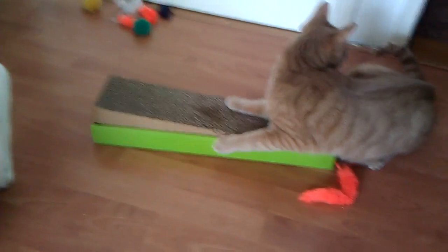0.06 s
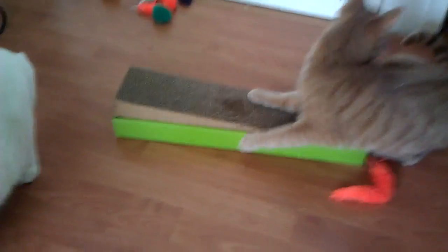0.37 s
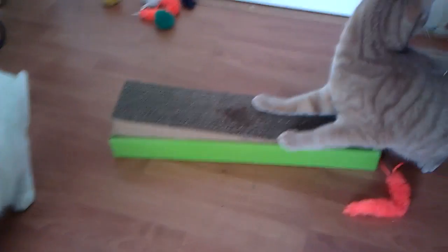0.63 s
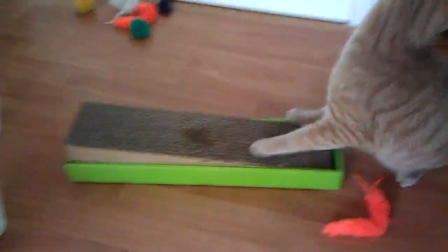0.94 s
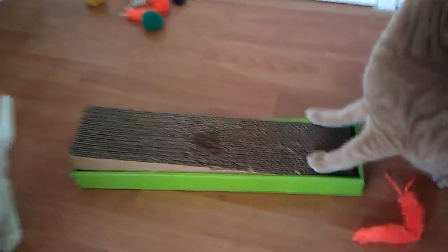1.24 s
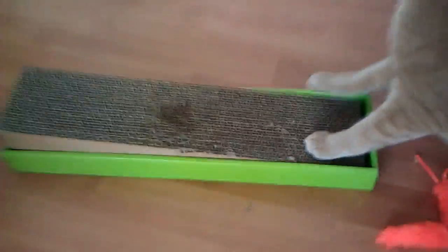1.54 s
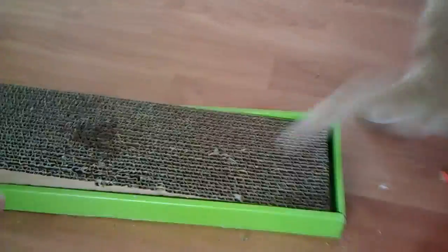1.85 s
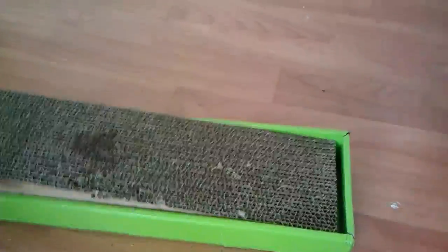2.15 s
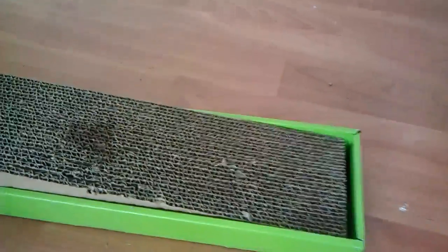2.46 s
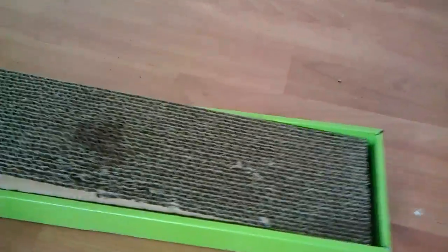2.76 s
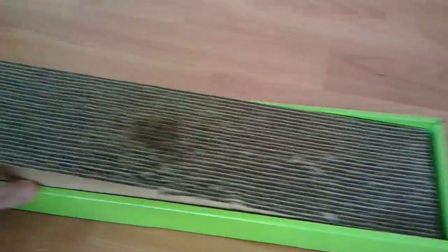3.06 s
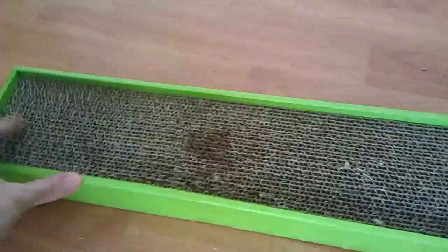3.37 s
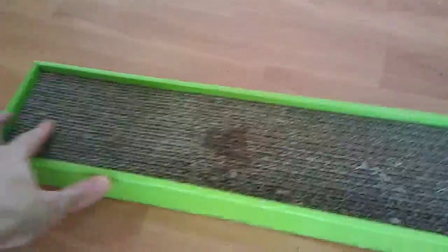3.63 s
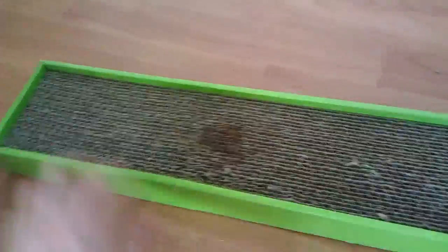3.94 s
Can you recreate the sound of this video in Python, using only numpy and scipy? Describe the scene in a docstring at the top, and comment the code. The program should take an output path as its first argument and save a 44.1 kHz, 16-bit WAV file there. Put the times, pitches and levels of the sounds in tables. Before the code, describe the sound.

Claws rake dryly over corrugated cardboard in a quiet little room, fading to light rubbing and ticks. Near the end the pad scrapes along and drops into its tray with one loud clack and a brief rasp.

```python
"""Dry, papery rasps: a cat rakes a corrugated cardboard pad, its claws snapping over the ridges.
It shifts its weight so that the pad bumps its tray, and shuffles off. After some light brushing, a hand
slides the pad along and presses it home with a sharp knock that rings the tray. The rubbing is tiny
fibre slips over smooth hiss; the hits are noise bursts coloured by the board. A small room with a hard
floor answers the hits, over a faint bed of air."""
import sys
import numpy as np
from scipy import signal
from scipy.fft import rfft, irfft
from scipy.io import wavfile
from scipy.ndimage import uniform_filter1d, minimum_filter1d

SR = 44100
rng = np.random.default_rng(int(sys.argv[2]) if len(sys.argv) > 2 else 0)


def put_to_file(sound):
    """Save the sound as 16-bit audio at rate SR, in the file named by the first command-line argument."""
    columns = np.atleast_2d(sound).T  # one column per channel
    safe = np.clip(columns, -1, 1)
    whole_steps = np.round(safe * 32767)
    wavfile.write(sys.argv[1], SR, whole_steps.astype(np.int16))


N = 176400
TOP_HZ = 8900

# the pad's body when rubbed: freq_hz, level_db
PAD_BODY = [(80, -17.5), (200, -7), (450, -3), (750, -3.5), (1100, -1.5), (1700, 1), (2400, -3.5),
            (4000, -25)]
# hiss of a soft rub: freq_hz, level_db
SOFT_HISS = [(1500, -37), (2600, -17), (3600, -12.5), (4500, -10), (5500, -4.5), (6200, -2.5), (6900, -9),
             (7800, -20.5), (8900, -41)]


def amp(db):
    """Decibels to gain."""
    return 10 ** (np.asarray(db) / 20)


def unit(x):
    """Scale to rms 1."""
    return x / np.sqrt(np.mean(x ** 2) + 1e-20)


def along(points, hz):
    """Read a curve of (freq_hz, value) points on a log axis."""
    freqs, values = np.transpose(points)
    return np.interp(np.log(hz + 1), np.log(freqs + 1), values)


def level(rows):
    """Gain envelope from (time_s, level_db) points, silent beyond them."""
    s, db = np.transpose(rows)
    return uniform_filter1d(amp(np.interp(np.arange(N) / SR, s, db, left=-120, right=-120)), size=64)


def coloured(x, spectrum):
    """Equalise x and cut it above TOP_HZ, at rms 1."""
    hz = np.fft.rfftfreq(len(x), 1 / SR)
    return unit(irfft(rfft(x) * amp(along(spectrum, hz)) * (hz < TOP_HZ), len(x)))


def through(x, spectrum):
    """Give x this spectrum with a minimum-phase filter, which keeps the attack crisp."""
    n = len(x)
    own = np.abs(uniform_filter1d(np.abs(rfft(x)) ** 2, size=24)) ** .5 + 1e-9
    wanted = amp(along(spectrum, np.fft.rfftfreq(n, 1 / SR)))
    cepstrum = irfft(np.log(wanted / own), n)
    cepstrum[1:n // 2] *= 2
    cepstrum[n // 2 + 1:] = 0
    return irfft(rfft(x) * np.exp(rfft(cepstrum)), n)


def burst(spectrum, attack_s, t60_s, cutoff_hz=TOP_HZ):
    """One contact: a short noise burst coloured by the board, dulled above cutoff_hz."""
    t = np.arange(SR // 4) / SR
    push = (1 - np.exp(-t / attack_s)) * np.exp(-np.log(1000) * t / t60_s)
    board = through(push * rng.standard_normal(len(t)), spectrum)
    dulled = signal.sosfilt(signal.butter(3, cutoff_hz, fs=SR, output="sos"), board)
    return unit(dulled) * np.sqrt(np.mean(push ** 2))


def friction(spectrum, smooth_share=0.53, slips_per_s=1400, spread_db=0.5):
    """Paper fibres slipping: tiny random clicks over a smooth rub."""
    slips = (rng.random(N) < slips_per_s / SR) * rng.choice([-1, 1], N)
    slips = unit(slips * amp(spread_db * np.minimum(rng.exponential(size=N), 4)))
    rub = rng.standard_normal(N)
    return coloured(np.sqrt(1 - smooth_share) * slips + np.sqrt(smooth_share) * rub, spectrum)


def patchy(x, flicker_db=4):
    """The hiss flickers in shallow, random patches of colour."""
    bands = signal.stft(x, nperseg=2048)[2]
    patches = uniform_filter1d(rng.standard_normal(bands.shape), size=2, axis=0)
    patches = unit(uniform_filter1d(patches, size=8, axis=1))
    return unit(signal.istft(bands * amp(flicker_db * patches), nperseg=2048)[1][:N])


def strokes(curves, hiss, body, body_db, body_exponent, smooth_share):
    """Rubbing on the pad: the paper hisses and the body follows less steeply."""
    effort = sum(level(c) for c in curves)
    body_gain = amp(body_db) * effort.max() * np.abs(effort / effort.max()) ** body_exponent
    return effort * patchy(friction(hiss, smooth_share)) + body_gain * friction(body)


def claw_rakes():
    """Claws scratch the paper in short, bright strokes."""
    curves = [
        [(0.0, -32), (0.018, -34), (0.042, -36), (0.048, -30.5), (0.082, -51), (0.1, -50)],
        [(0.1, -48), (0.154, -44), (0.172, -40.5), (0.188, -47), (0.23, -42.5), (0.268, -46.5), (0.41, -50)],
    ]  # one envelope a stroke: time_s, level_db
    hiss = [(1500, -35), (2500, -12), (3300, -10), (4400, -9), (5300, -0.5), (6300, -3), (7100, -2.5),
            (7900, -20.5), (8900, -26)]  # claws on paper: freq_hz, level_db
    return strokes(curves, hiss, PAD_BODY, body_db=-26.5, body_exponent=0.37, smooth_share=0.58)


def edge_snaps():
    """Edges of the corrugation catch and let go."""
    snaps = [(0.044, -47), (.161, -52), (0.216, -35), (0.488, -44), (0.66, -44), (.673, -47), (1.054, -47),
             (1.093, -52), (2.528, -42), (2.685, -40.5), (2.801, -34.5), (2.9825, -35), (3.453, -21),
             (3.484, -27)]  # paper edges: start_s, level_db
    colour = [(300, -34), (1500, -14), (2600, -31.5), (4000, -9.5), (6000, 13), (7200, -3), (8000, -14),
              (9000, -30)]  # a thin, bright tick: freq_hz, level_db
    out = np.zeros(N)
    for s, db in snaps:
        add(out, s, amp(db) * burst(colour, attack_s=0.00074, t60_s=0.039))
    return out


def claw_pull():
    """Claws drag through the pad in one long, surging rasp."""
    curves = [
        [(0.41, -53), (0.444, -41), (0.474, -40), (0.5, -30), (0.628, -42.5), (0.678, -33.5), (0.698, -43),
         (0.718, -34), (0.768, -46.5), (0.82, -51.5)],
    ]  # stroke envelope: time_s, level_db
    hiss = [(1500, -33), (2500, -16), (3300, -13), (4300, -10.5), (5200, -3.5), (6200, -1.5), (7100, 0),
            (7700, -16.5), (8900, -29.5)]  # dragging claws: freq_hz, level_db
    return strokes(curves, hiss, PAD_BODY, body_db=-23, body_exponent=0.3, smooth_share=0.74)


def soft_bumps():
    """Paws and fingers land and the pad rocks against its tray."""
    bumps = [(0.662, -37, 450, 0.041), (.669, -32, 2400, 0.14), (0.7098, -25, 1370, 0.13),
             (0.727, -32, 1300, 0.11), (.857, -38.5, 690, 0.057), (.976, -42.5, 450, 0.062),
             (1.059, -45.5, 900, .05), (1.089, -49.5, 600, 0.24), (1.118, -48.5, 384, 0.083),
             (1.19, -47, 346, 0.046), (2.354, -49.5, 600, 0.063), (2.568, -52, 2030, 0.054),
             (2.596, -48.5, 1610, 0.11), (2.618, -43.5, 292, 0.042), (2.677, -48.5, 1140, 0.066),
             (3.077, -44, 1010, 0.042), (3.321, -51, 503, 0.072)]  # soft contacts: start_s, level_db, cutoff_hz, t60_s
    colour = [(40, -30), (90, -14), (170, 0), (260, -5), (390, -1), (560, -3.5), (830, -0.5), (1250, -3),
              (2000, -2.5), (6000, 12)]  # the thud before its low-pass: freq_hz, level_db
    out = np.zeros(N)
    for s, db, hz, t60 in bumps:
        add(out, s, amp(db) * burst(colour, attack_s=0.0031, t60_s=t60, cutoff_hz=hz))
    return out


def paw_shuffles():
    """Paws rub the paper as the cat steps off."""
    curves = [
        [(0.82, -49), (0.862, -51.5), (1.002, -46), (1.06, -37), (1.074, -43.5), (1.092, -41), (1.158, -53.5),
         (1.2, -51)],
        [(1.2, -54), (1.444, -49.5), (1.502, -52.5), (1.91, -38.5), (2.028, -45.5), (2.054, -53.5),
         (2.094, -54.5), (2.1, -52)],
    ]  # one envelope a stroke: time_s, level_db
    return strokes(curves, SOFT_HISS, PAD_BODY, body_db=-13.5, body_exponent=0.91, smooth_share=0.52)


def light_brushes():
    """Light touches whisper across the pad."""
    curves = [
        [(2.1, -55), (2.256, -50.5), (2.34, -51), (2.37, -57), (2.444, -61.5), (2.534, -47), (2.558, -55),
         (2.66, -55.5)],
        [(2.66, -65), (2.68, -52), (2.792, -47), (2.802, -42.5), (2.974, -57), (2.984, -55), (2.99, -44),
         (3.23, -52.5)],
        [(3.7, -63), (3.752, -62), (3.786, -53.5), (3.808, -55), (3.824, -49.5), (3.866, -56.5), (3.882, -65),
         (4.0, -74)],
    ]  # one envelope a stroke: time_s, level_db
    return strokes(curves, SOFT_HISS, PAD_BODY, body_db=-13.5, body_exponent=0.93, smooth_share=0.7)


def pad_slide():
    """A hand pushes the pad along with a grainy scrape."""
    curves = [
        [(3.23, -52), (3.3, -32), (3.39, -41.5), (3.41, -36.5), (3.436, -39), (3.454, -32), (3.476, -33),
         (3.488, -24.5)],
    ]  # stroke envelope: time_s, level_db
    hiss = [(1500, -31), (2600, -6.5), (3500, -9), (4500, -4), (5500, -0.5), (6100, 2.5), (6900, -2),
            (7800, -16.5), (8900, -33.5)]  # sliding cardboard: freq_hz, level_db
    body = [(100, -16.5), (400, -12), (750, 3.5), (1200, -1), (1900, 6.5), (2400, -9), (4000, -26.5)]  # the moving pad's body: freq_hz, level_db
    return strokes(curves, hiss, body, body_db=-14, body_exponent=0.82, smooth_share=0.28)


def tray_knock(ring_db=-16, ring_attack_s=0.00066):
    """The pad drops into the tray in quick contacts; the hardest sets both ringing."""
    contacts = [(3.4912, -32, 7000), (3.4971, -10.5, 793), (3.4989, -8, 7550), (3.5019, -9, 2400),
                (3.506, -20, 1630), (3.5113, -25, 6000)]  # pad on tray: start_s, level_db, cutoff_hz
    colour = [(30, -17), (90, -13.5), (180, -0.5), (250, -8), (330, 10), (480, -5), (720, -4.5), (950, 2.5),
              (1200, -1), (1950, 7.5), (2400, -17), (3200, 3.5), (4900, -2.5), (6000, 12), (6700, -5),
              (7600, -12), (9000, -30)]  # a hard clack: freq_hz, level_db
    modes = [(134.4, -11, 0.33), (183.7, -5.5, 0.28), (317, -0.5, .19), (374, -4, .18), (580.4, 6.5, 0.054),
             (1023, -1, 0.056), (1140, -4, 0.18), (1254, 1.5, 0.18), (1400, -6, 0.11), (1540, -29, 0.11),
             (1930, -1, 0.14), (3094, 7.5, .1), (3106, -7.5, .1), (3595, 0, .1)]  # pad and tray resonances: pitch_hz, level_db, t60_s
    out, t = np.zeros(N), np.arange(SR // 2) / SR
    for s, db, hz in contacts:
        add(out, s, amp(db) * burst(colour, attack_s=0.00012, t60_s=0.035, cutoff_hz=hz))
    ring = sum(amp(db) * np.exp(-np.log(1000) * t / t60) * np.sin(2 * np.pi * (hz * t + rng.random()))
               for hz, db, t60 in modes)
    hardest_s, hardest_db, _ = max(contacts, key=lambda row: row[1])
    add(out, hardest_s, amp(hardest_db + ring_db) * ring * (1 - np.exp(-t / ring_attack_s)))
    return out


def seating_scrape():
    """The pad's sides scrape down the tray walls."""
    curve = [(3.488, -33), (3.504, -14), (3.53, -25.5), (3.565, -27), (3.58, -46), (3.592, -58),
             (3.66, -72)]  # scrape envelope: time_s, level_db
    colour = [(50, -24), (100, -18.5), (300, -7), (600, -1.5), (1000, -1.5), (2000, -10), (2400, -5),
              (3200, -8), (4500, -2), (6200, -4), (7000, -4.5), (7800, -19.5), (9000, -36)]  # a broad rasp: freq_hz, level_db
    return level(curve) * patchy(friction(colour))


def room_echo(x, wall_delay_s=0.006):
    """A short, dense echo whose top treble dies first."""
    decay = [(100, 0.24), (300, 0.3), (1000, 0.27), (4000, .27), (8000, 0.23)]  # reverb time: freq_hz, t60_s
    hz, t, bands = signal.stft(rng.standard_normal(SR // 2), SR, nperseg=256)
    fade = np.exp(-np.log(1000) * t / along(decay, hz)[:, None])
    tail = signal.istft(bands * fade, SR, nperseg=256)[1]
    response = np.pad(tail / np.linalg.norm(tail), (round(wall_delay_s * SR), 0))
    return signal.fftconvolve(x, response)[:N]


def room_air():
    """Faint room noise swells and sinks under everything."""
    colour = [(20, 2.5), (45, -13), (65, 7), (100, -3), (200, -3), (400, -1.5), (800, -2.5), (1000, -1.5),
              (1200, -4), (2500, -11.5), (4000, -12), (6000, -3.5), (7500, -17.5), (8900, -36.5)]  # rumble and hiss: freq_hz, level_db
    swell = [(0, -56.5), (.8, -52), (1.4, -57.5), (1.95, -55.5), (2.15, -59), (2.9, -58.5), (3.3, -54.5),
             (4, -59)]  # slow envelope: time_s, level_db
    return level(swell) * coloured(rng.standard_normal(N), colour)


def add(track, start_s, sound):
    """Mix a sound in at a time."""
    part = track[round(start_s * SR):][:len(sound)]
    part += sound[:len(part)]


def scene(echo_db=-9):
    """Dry strokes, hits with their echo, and room air, in mono."""
    rubs = claw_rakes() + claw_pull() + paw_shuffles() + light_brushes() + pad_slide()
    hits = edge_snaps() + soft_bumps() + tray_knock() + seating_scrape()
    return (rubs + hits + room_air() + amp(echo_db) * room_echo(hits))[None]


def record(dry, ceiling=0.78):
    """A fast limiter holds the highest peaks, then a steep low-pass closes the top."""
    needed = np.minimum(1, ceiling / (np.abs(dry) + 1e-9))
    gain = uniform_filter1d(minimum_filter1d(needed, size=129), size=64)
    return signal.sosfilt(signal.butter(20, TOP_HZ, fs=SR, output="sos"), dry * gain)


dry = scene()
out = record(dry)
put_to_file(out)
```